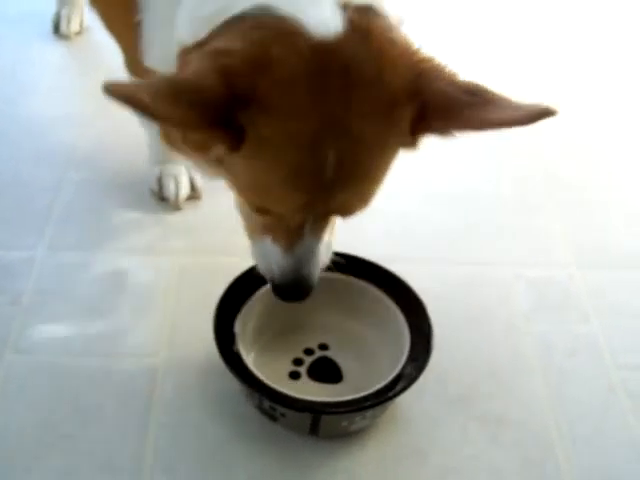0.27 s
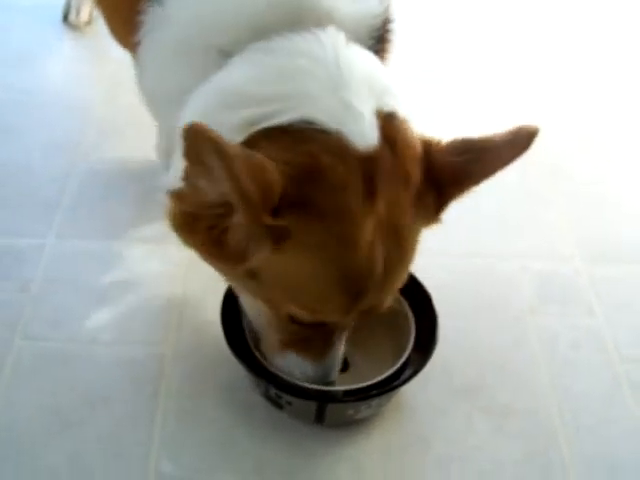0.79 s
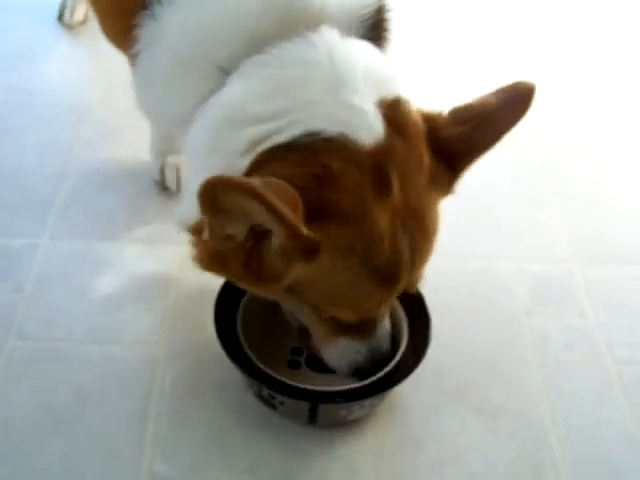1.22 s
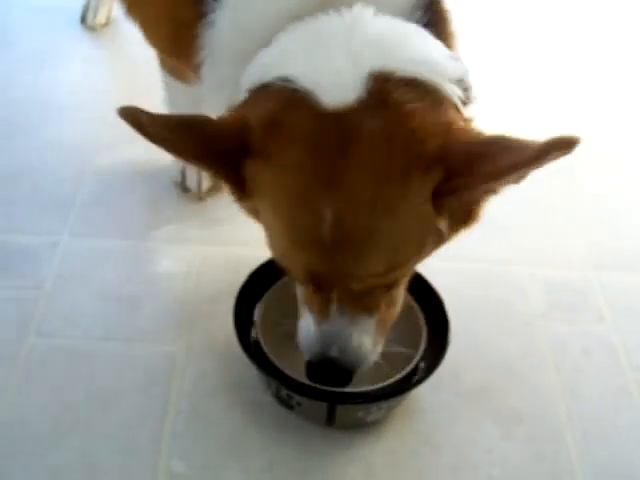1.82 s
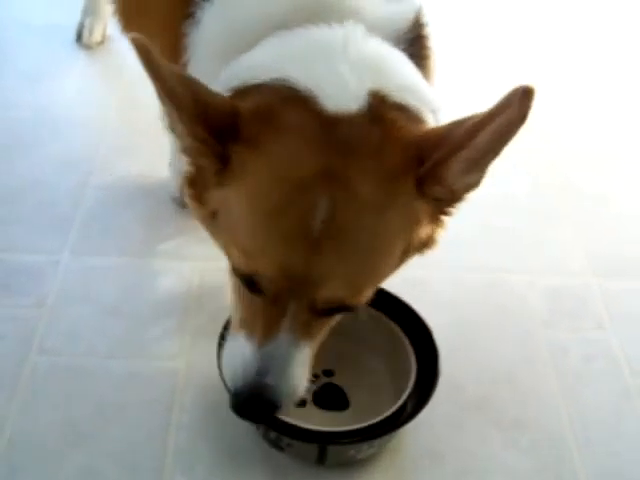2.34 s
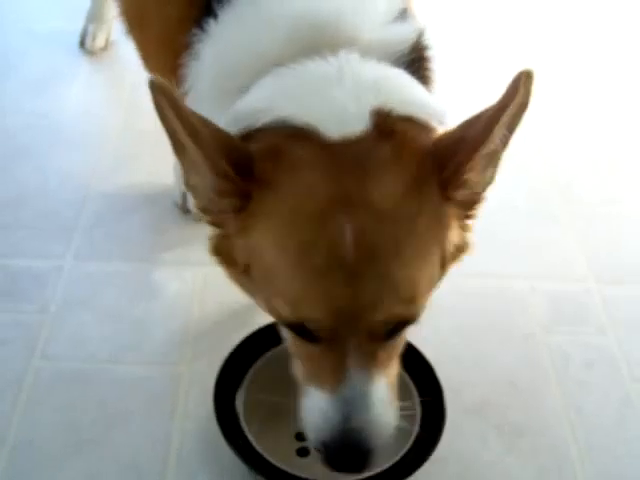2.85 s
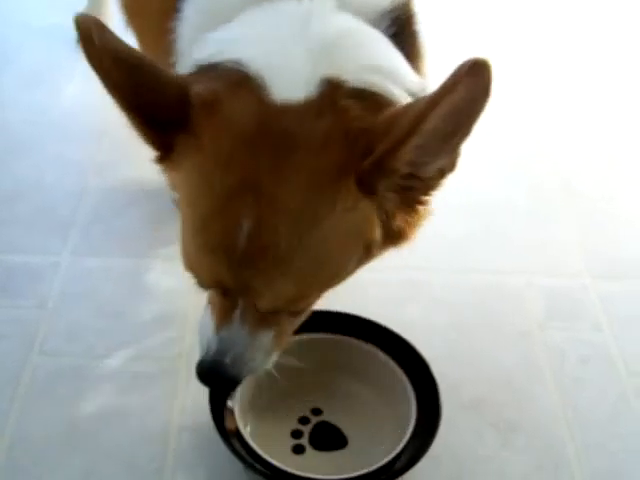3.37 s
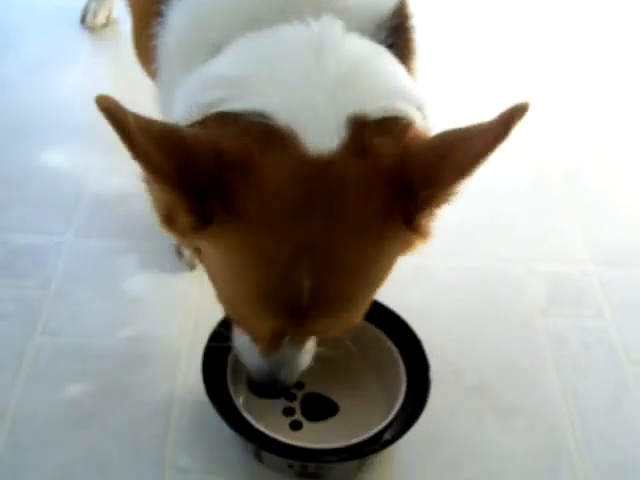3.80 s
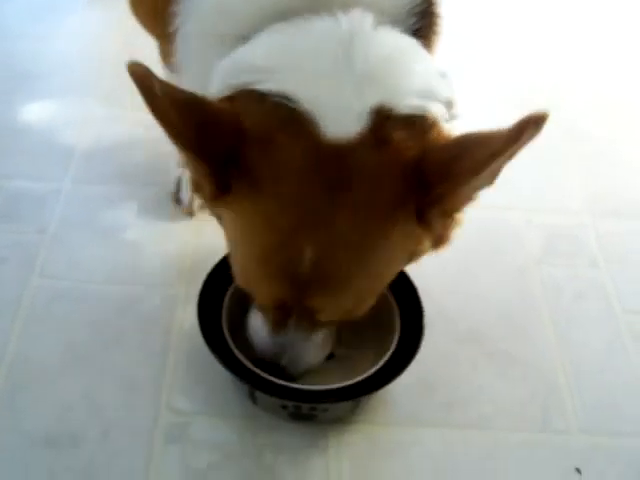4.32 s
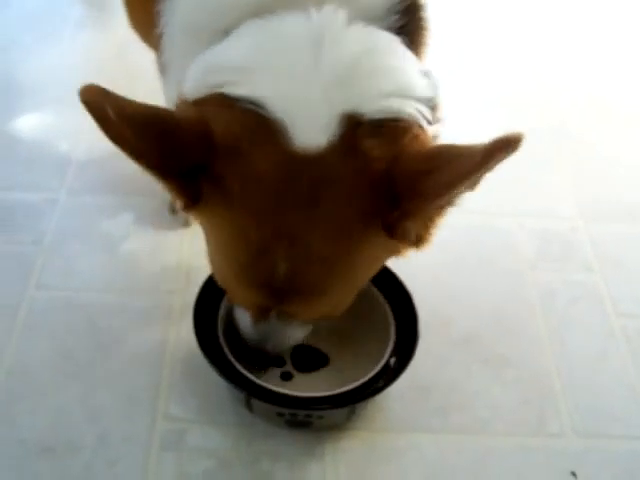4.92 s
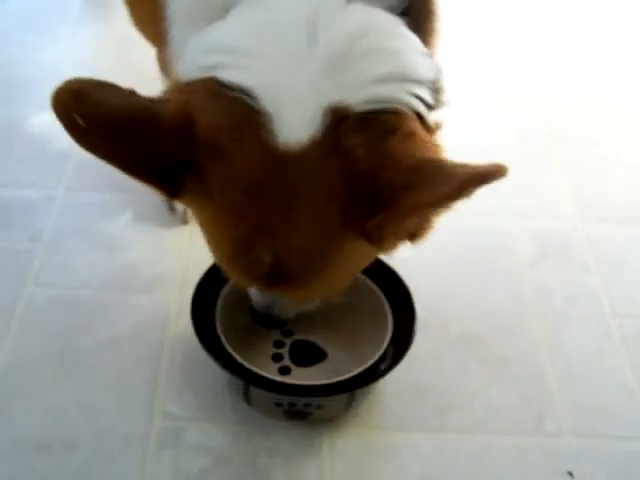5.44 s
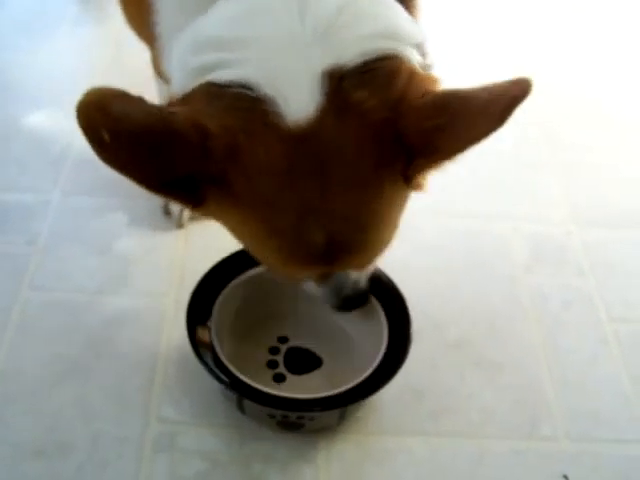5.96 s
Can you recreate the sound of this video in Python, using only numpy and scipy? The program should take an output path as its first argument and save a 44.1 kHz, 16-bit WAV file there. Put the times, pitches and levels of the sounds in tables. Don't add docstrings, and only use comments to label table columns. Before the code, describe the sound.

A low, slightly unsteady fridge hum and room murmur run throughout, with faint nose hiss and wet fizz. At 0.06 seconds a sniff leads into sharp wet smacks and dry clicks around 0.27 and 0.35, with another smack near 0.65. Until 1.9 there are only light laps and tiny ticks. Short low scrapes of the bowl on tile come at 1.9, 2.3 and 2.7, with a hard clack at 2.26 and a wet smack at 2.5. Around 3.5 a claw skids and crackles, the bowl knocks down at 3.56, and a loud smack snaps at 3.6. Quieter licking follows. At 4.73 a click sets the bowl ringing like a small bell for a quarter second, with smacks to 5.04. A very loud knock and smack at 5.51 bounces at 5.56 with roomy wash; short knocks and piercing clicks hit at 5.83 and 5.87, then faint laps. Small close microphone, limited treble, clipped peaks.

```python
import sys
import numpy as np
from scipy import signal
from scipy.fft import rfft, irfft, next_fast_len
from scipy.io import wavfile
from scipy.ndimage import uniform_filter1d, map_coordinates

SR = 44100
rng = np.random.default_rng(int(sys.argv[2]) if len(sys.argv) > 2 else 0)


def store_pcm(level_fs):
    pcm = np.round(np.clip(level_fs, -1, 1) * 32767).astype(np.int16)
    wavfile.write(sys.argv[1], SR, np.atleast_2d(pcm).T)


def boost_factor(decibels):
    exponent = np.asarray(decibels, float) / 20
    return 10 ** exponent


N = 272979
T = np.arange(N) / SR

# start in seconds, peak in dB, centre in Hz, width in octaves, room answer in dB.
SMACKS = [(0.267, -11, 4210, 2.6, -7), (0.35, -1.5, 3600, 1.4, -8.5), (0.6427, -15, 6340, 1.3, -13),
          (0.7103, -27, 2290, 0.62, -3.5), (1.9734, -25, 3750, 0.92, -7), (2.5024, -8, 6850, 2.1, -8),
          (3.5985, 1.5, 3860, 1.17, -10.5), (4.4682, -22.5, 4500, 1.5, -27.5), (4.483, -17, 3020, 0.79, -9),
          (4.7315, -14.5, 3920, 1.1, -5.5), (4.8299, -1.5, 3570, 1.1, -8.5), (5.0374, -8, 4400, 1.1, -16),
          (5.5139, 7, 3380, 1.2, -17), (5.8295, -8.5, 3760, 0.78, -3), (5.8705, -12, 3440, .7, -6)]
# start in seconds, peak in dB, centre in Hz, width in octaves.
LAPS = [(0.0074, -24, 7720, 0.9), (0.224, -30, 3630, 2.7), (0.9472, -24, 6230, 2.8),
        (0.99, -32.5, 3980, 1.5), (1.0988, -30.5, 3860, 3.6), (1.431, -35, 3380, 1.7),
        (1.825, -38, 5480, 2), (2.9417, -28, 2270, 2.1), (3.323, -32.5, 4930, 2.5), (4.281, -35, 4500, 2.1),
        (4.989, -28.5, 4820, 1.4), (5.1906, -32, 6400, 1.1), (5.256, -32, 5080, 2.6),
        (5.7935, -39.5, 2440, .93), (6.013, -30, 2720, 1.4), (6.169, -27, 3160, 1.5)]
SMACK_T60, LAP_ROOM_DB = 0.045, -3

# start and length in seconds, level in dB, centre in Hz, width in octaves.
SWELLS = [(.06, .2, -47, 3500, .45), (.3475, .022, -22, 4000, 1.5), (2.35, .07, -46, 1480, .12),
          (2.493, .022, -31, 5800, 1.1), (2.13, .12, -49, 2800, .9), (2.9, .18, -48, 3200, .8),
          (1.8, .1, -50, 2500, 1.5), (2.915, .06, -44, 2330, .22), (3.93, .07, -48, 5500, 1.2),
          (2.57, .29, -40, 3300, .65), (4.735, .09, -33, 4100, .9), (4.745, .085, -43, 2400, .8),
          (4.822, .03, -25, 4200, 1.5), (5.032, .011, -25, 5100, .8), (5.518, .06, -26, 3000, 1),
          (5.788, .025, -47, 5500, .5), (5.824, .005, -42, 1500, 1.5)]
SWELL_SOFTER = 1.5

# frequency in Hz, level in dB per Hz.
NOSE = [(1200, -12), (2300, -1.5), (2900, -9), (3500, -5.5), (4100, 1.5), (4900, -17.5), (8000, -52)]
# frequency in Hz, level in dB per Hz.
FIZZ = [(3500, -52), (5000, 2.5), (6800, 5), (8200, -6)]
# frequency in Hz, level in dB per Hz.
SKID = [(470, -35), (800, -16), (1240, -17.5), (2500, -7), (3370, -6.5), (3740, -5), (7040, -22),
        (7900, -23.5), (10300, -53), (17400, -120)]
# time in seconds, level in dB.
SLIP = [
    (3.46, -51.5),
    (3.54, -24),
    (3.61, -33.5),
]
NOSE_DB, NOSE_SWING_DB, NOSE_GRAIN_DB = -52, 1.8, 2.2
FIZZ_DB, FIZZ_SWING_DB, SKID_GRAIN_DB = -57.5, 0.5, 4.5
SPIT_DB, SPIT_SPREAD_DB = -38, 8.5

# start in seconds, peak in dB, pitch in Hz, room answer in dB.
TICKS = [(0.2635, -8.5, 4400, -22.5), (0.3518, -6, 3570, -13.5), (0.9502, -18, 6450, -15),
         (1.1016, -22.5, 3950, -22.5), (1.4337, -27, 1800, -12.5), (2.1279, -9.5, 2890, -32),
         (2.2632, 0.5, 2450, -33.5), (2.37, -31.5, 4180, -28), (2.5031, -13, 6900, -31),
         (2.5387, -7.5, 4480, -29), (0.7228, -21, 2420, -26), (3.2024, -16.5, 4110, -28.5),
         (3.5174, -9.5, 2750, -26), (3.5328, -13.5, 2590, -10), (3.5985, 5.5, 4540, -30),
         (3.7938, -12.5, 5100, -40.5), (4.134, -24.5, 2260, -17.5), (4.2783, -29, 4200, -16),
         (4.4691, -15, 3320, -48.5), (4.482, -9, 3410, -34), (4.514, -14, 2650, -28.5),
         (4.7314, 0, 2170, -33.5), (5.1528, -19, 2050, -26), (5.2863, -22, 2230, -24.5),
         (5.5126, 6, 3530, -49.5), (5.8296, 0, 3800, -30.5), (5.8716, 12, 3430, -34.5),
         (6.108, -15, 5200, -29)]
# start in seconds, peak in dB, pitch in Hz, room answer in dB.
CLACKS = [(0.268, -16.5, 1880, -21), (0.351, -34.5, 1450, -17.5), (1.062, -31, 1065, -12),
          (2.2614, -5, 1270, -26.5), (5.8253, -21.5, 1160, -24), (5.5095, -28.5, 1494, -26),
          (2.2615, -14, 593, -33.5), (3.563, -7, 732, -36), (3.599, -14.5, 1475, -11.5),
          (4.828, -23.5, 1250, -3.5), (5.5128, 3, 1610, -21), (5.5127, 0, 790, -40)]
# start in seconds, peak in dB, pitch in Hz, room answer in dB.
SNAPS = [(0.764, -28.5, 4100, -37.5), (2.2616, -4.5, 3930, -50), (2.263, -22, 8700, -45.5),
         (3.4, -32, 7300, -30.5), (5.8716, -3.5, 10000, -36), (5.0418, -4.5, 4960, -34.5),
         (4.7313, -1, 4400, -42), (5.0385, -8, 5500, -45), (11, -22, 4500, -11.5)]
# start in seconds, peak in dB, pitch in Hz.
PIPS = [(0.2205, -29, 3500), (0.5883, -22, 6000), (0.642, -29, 7020), (0.709, -32, 2310),
        (2.878, -23, 3480), (0.798, -30.5, 1850), (0.8915, -38.5, 4200), (0.987, -24, 3960),
        (1.034, -31, 1840), (1.3495, -26, 1830), (1.59, -30.5, 2100), (1.764, -29, 2680),
        (1.826, -22.5, 5350), (1.971, -26.5, 4100), (2.173, -27, 2580), (2.219, -25, 3220),
        (3.147, -26, 3800), (3.3206, -37.5, 3170), (3.338, -28, 2590), (3.3605, -26.5, 3350),
        (3.4774, -21.5, 3250), (3.8502, -23.5, 5380), (3.877, -26.5, 3630), (4.3627, -24, 3040),
        (4.392, -27, 2630), (4.404, -23.5, 4980), (6.012, -26.5, 1920), (6.089, -33.5, 3160),
        (6.127, -25, 4680), (6.1688, -30.5, 3110)]
# start in seconds, peak in dB, pitch in Hz.
CATCHES = [(3.5206, -16.5, 2680), (3.5285, -11.5, 3650), (3.5341, -17.5, 2540), (3.539, -13.5, 4000),
           (3.5424, -18.5, 2640), (3.548, -12, 3700), (3.5518, -20.5, 3040), (3.6007, -2.5, 4160),
           (3.6052, -6, 4350), (3.6084, -3.5, 4410), (3.6126, -8.5, 4090), (4.8265, -9, 2020),
           (4.8316, -11.5, 2050), (4.8384, -19, 2090), (4.8414, -14.5, 4760)]
# start in seconds, peak in dB, pitch in Hz.
FLECKS = [(.685, -32, 2450), (.748, -30, 2400), (.792, -32, 7000), (1.258, -33, 7000), (1.272, -31, 5200),
          (1.272, -34, 2900), (1.368, -35, 6200), (1.393, -34, 5300), (1.434, -30, 5000),
          (1.449, -30, 4800), (1.479, -35, 3900), (1.505, -33, 6800), (2.185, -31, 2610), (2.57, -32, 2400),
          (2.83, -31, 2100), (3.564, -17, 4240), (4.03, -34, 2800), (4.115, -33, 5900), (4.157, -33, 5800),
          (4.226, -36, 6500), (4.262, -34, 3300), (4.305, -32, 4300), (4.318, -34, 2830), (4.33, -36, 7000),
          (4.358, -33, 2870), (4.383, -30, 5200), (4.449, -32, 4800), (4.89, -26, 3900), (5.028, -27, 4300),
          (5.132, -31, 5800), (5.183, -35, 5200), (5.259, -30, 4800), (5.296, -32, 3200),
          (5.314, -30, 5200), (5.443, -34, 5400), (5.5162, -4, 3200), (5.863, -26, 6800),
          (5.933, -29, 4900), (5.983, -28, 6000), (5.983, -30, 2300), (.277, -22, 1900), (.361, -22, 1600),
          (.372, -18, 2300)]
TICK_CYCLES, PIP_CYCLES, CLACK_CYCLES, SNAP_CYCLES, FLECK_CYCLES = 7.6, 9.4, 9.7, 13, 8.5
PIP_ROOM_DB, CATCH_ROOM_DB, FLECK_ROOM_DB = -24.5, -27.5, -28
CATCH_DB, FLECK_DB = 4.5, 3
# delay in seconds, level in dB.
ECHOES = [
    (.0011, -5),
    (.0023, -8),
    (.0037, -12),
]

# start in seconds, peak in dB, upper body in dB,
# fall by 60 dB in seconds, room answer in dB.
KNOCKS = [
    (3.563, -7, -15, 0.28, -12.5),
    (5.513, -1.5, -3.5, 0.16, -6.5),
    (5.5556, -11.5, -1, 0.26, 1),
    (5.83, 1, -2.5, 0.059, -7.5),
]
# frequency in Hz, level in dB.
FLOOR = [(175, -6.5), (210, -9), (245, -12.5), (290, 1), (370, -0.5), (570, -1.5), (667, -5.5), (789, -4),
         (878, -11), (1100, -13), (1380, -13)]
SEATING = [0.97, 0.98, 0.75, 0.964]
THUMP_DB = [-20, -15, -14, -27]
THUMP_HZ, THUMP_T60 = 105, 0.35
UPPER_DIES = .9

# start in seconds, level in dB of each of three tones, free ring in seconds.
RINGS = [(4.7313, -9, -40, -60, .24), (4.761, -19, -60, -60, .21), (4.768, -18, -60, -60, .203),
         (4.768, -60, -60, -18, .125), (4.778, -20.5, -60, -60, .045), (5.513, -44, -30, -48, .1),
         (5.547, -18.5, -60, -60, .125), (5.83, -40, -33, -48, .012), (5.858, -29, -60, -60, .19)]
BOWL = [
    1855,
    4246,
    4764,
]
# phase in radians, level in steps of 3 dB.
UNREST = [.2, .85, .6]
RING_T60 = [.53, .5, .7]
RING_BUILD_S = [.016, .002, .004]
FLASH_DB = [-5, 1.5, -8]
FLASH_T60 = .125
DAMP_DB, DAMP_S = -8, .05
# start in seconds, level in dB, frequency in Hz, length in
# seconds.
GLINTS = [(.555, -50, 4246, .075), (1.645, -50, 4246, .05), (.64, -37, 6700, .04), (2.262, -40, 2580, .055),
          (2.262, -40, 1950, .05), (4.675, -48, 4246, .055), (4.735, -43, 7660, .08),
          (4.985, -46, 7450, .045), (5.045, -37, 3950, .05), (5.835, -41, 7300, .03),
          (6.11, -54, 4764, .06), (6.155, -48, 6650, .03),
          (4.731, -11, 4764, .041), (4.732, -27, 4651, .07), (4.732, -31, 4264, .1),
           (4.732, -37, 4474, .07), (4.732, -41, 4161, .07), (4.732, -42, 3849, .09),
           (5.515, -11, 4246, .03), (5.545, -23, 4300, .03), (5.578, -26, 4246, .09),
           (5.832, -19, 4246, .022), (2.262, -45, 1480, .04)]

# start and length in seconds, rumble in dB, grit in dB.
DRAG = [
    (1.935, 0.15, -32, -34),
    (2.312, 0.15, -32, -35),
    (2.667, 0.17, -33.5, -38.5),
]
# frequency in Hz, level in dB per Hz.
RUMBLE = [(47, -53), (80, -12.5), (140, -13.5), (167, 4.5), (253, 0.5), (345, -10), (579, -25.5),
          (700, -29), (910, -43.5), (1540, -120)]
# frequency in Hz, level in dB per Hz.
GRIT = [(290, -53), (500, -4), (581, -6.5), (1290, -18), (1480, -15), (2220, -15.5), (4330, -20.5),
        (7900, -32), (10300, -46.5), (17400, -120)]
PUSH_RISE_S, PUSH_EASE_S, PUSH_RANGE_DB = .035, .04, 12
# start in seconds, level in dB, frequency in Hz, length in seconds.
STIRS = [(1.955, -34, 240, .05), (1.965, -41, 517, .08), (1.99, -32, 178, .06), (2.035, -29, 178, .06),
         (2.335, -33, 180, .07), (2.39, -33, 175, .07), (2.365, -30.5, 250, .08), (2.375, -41, 571, .06),
         (2.72, -30, 245, .08), (2.7, -40, 380, .09), (3.572, -22, 280, .03), (5.512, -14, 185, .022),
         (5.523, -14, 300, .04), (5.545, -19, 590, .045), (5.553, -12, 199, .03), (5.575, -15, 291, .045),
         (5.6, -31, 115, .12), (5.635, -28, 220, .04), (5.865, -23, 295, .04), (5.905, -30, 310, .03),
         (5.92, -33, 120, .05)]
# start in seconds, level in dB, frequency in Hz, length in seconds.
SINGS = [(1.97, -38, 4246, .105), (2.335, -49, 4246, .13), (2.372, -43, 4246, .045), (2.74, -47, 4246, .03),
         (4.822, -32, 3200, .02), (4.828, -32, 4030, .022), (4.826, -33, 4420, .02),
         (4.845, -38, 3230, .045), (5.465, -49, 4500, .03)]

# start in seconds, level in dB, centre in Hz, width in octaves.
WASHES = [
    (3.601, -28, 3490, 1.7),
    (4.83, -33, 3610, 1.1),
    (5.531, -10, 3000, 1.5),
    (5.87, -38, 3640, 0.79),
]
WASH_BUILD_S, WASH_T60 = 0.013, 0.33

# multiple of the mains frequency, level in dB.
HUM = [
    (1, -69.5),
    (2, -38.5),
    (4, -39),
    (6, -48.5),
]
MAINS_HZ = 60
# frequency in Hz, level in dB.
RATTLE = [(157, -56.5), (196, -50), (264, -49.5), (314, -47.5), (337, -49.5), (384, -50.5), (408, -47.5),
          (456, -52), (471, -51.5), (669, -62.5)]
# frequency in Hz, level in dB per Hz.
AIR = [(12, -27), (20, -1), (70, -5), (112, -6), (137, 0), (181, -11.5), (244, -3), (284, -7), (383, -6),
       (543, -11.5), (1040, -16), (1900, -26.5), (4120, -24), (6800, -36), (7900, -49.5), (10300, -74.5),
       (17400, -120)]
AIR_DB = -40

# frequency in Hz, level in dB.
MIC = [(10, -19.5), (60, -1), (150, 0), (6000, -1), (7600, -3.5), (8050, -15), (8400, -58)]


def unit(x):
    return x / np.sqrt(np.mean(x ** 2) + 1e-20)


def along(points, hz):
    f, v = np.transpose(points)
    return np.interp(np.log(hz + 1), np.log(f + 1), v, left=-120, right=-120)


def curve(points):
    s, db = np.transpose(points)
    return np.interp(T, s, db, left=-120, right=-120)


def wobble(rate):
    knots = rng.standard_normal(int(N * rate / SR) + 4)
    return map_coordinates(knots, [T * rate])


def filtered(x, response):
    m = next_fast_len(len(x) + 4096)
    return irfft(rfft(x, m) * response(np.fft.rfftfreq(m, 1 / SR)), m)[:len(x)]


def hiss(spectrum, grain_db, rate):
    noise = filtered(rng.standard_normal(N), lambda hz: boost_factor(along(spectrum, hz)))
    return unit(boost_factor(grain_db * wobble(rate)) * noise)


def puff_of_air(hz, octaves):
    noise = rng.standard_normal(SR // 2)
    return unit(filtered(noise, lambda f: 1 / (1 + (2 * np.log2((f + 1) / hz) / octaves) ** 4)))


def add(x, s, sound):
    part = x[round(s * SR):][:len(sound)]
    part += sound[:len(part)]


def wavering(hz, turns):
    flicker = boost_factor(3 * turns * wobble(60))
    return unit(flicker * np.sin(2 * np.pi * hz * T + turns * wobble(62)))


def glints(rows, turns):
    out = np.zeros(N)
    for s, db, hz, length in rows:
        u = np.clip((T - s) / length, 0, 1)
        out += boost_factor(db - 5.8 * u) * np.sin(np.pi * u ** .5) * wavering(hz, turns)
    return out


def smacks():
    out, t = np.zeros(N), T[:SR // 2]
    laps = [(*lap, LAP_ROOM_DB) for lap in LAPS]
    for s, db, hz, octaves, room_db in [*SMACKS, *laps]:
        shape_db = 2.5 * rng.standard_normal(60)

        def mouth(f):
            band = 1 + (np.log2((f + 1) / hz) / max(octaves / 2, .1)) ** 2
            return boost_factor(np.interp(f / 200, np.arange(60), shape_db)) / band

        depth_db = 4.2 * np.exp(-t / .03)
        flicker = unit(uniform_filter1d(rng.standard_normal(len(t)), size=40))
        crackle = rng.standard_normal(len(t)) * boost_factor(depth_db * flicker)
        burst = boost_factor(-60 * t / SMACK_T60) * (1 - np.exp(-t / 0.001))
        room = boost_factor(room_db - 60 * t / 0.35) * (1 - np.exp(-t / 0.011))
        add(out, s, boost_factor(db - 10) * unit(filtered(crackle, mouth)) * (burst + room))
    return out


def swells():
    out = np.zeros(N)
    for s, length, db, hz, octaves in SWELLS:
        u = np.linspace(0, 1, round(length * SR))
        shape = np.sin(np.pi * u ** 0.79) ** (0.23 + SWELL_SOFTER * length)
        add(out, s, boost_factor(db) * puff_of_air(hz, octaves)[:len(u)] * shape)
    return out


def breath():
    return boost_factor(NOSE_DB + NOSE_SWING_DB * wobble(12)) * hiss(NOSE, NOSE_GRAIN_DB, rate=24)


def saliva():
    out, t = np.zeros(N), T[:200]
    when, size, pitch = rng.random((130, 3)).T
    level_db = np.minimum(SPIT_DB - SPIT_SPREAD_DB * np.log(size), -26)
    for s, db, hz in zip(when * T[-1], level_db, 2500 * 3 ** pitch):
        add(out, s, boost_factor(db - 60 * t * hz / 3.9) * np.sin(2 * np.pi * hz * t))
    return out + boost_factor(FIZZ_DB + FIZZ_SWING_DB * wobble(9.5)) * hiss(FIZZ, grain_db=4.5, rate=72)


def paw_skid():
    return boost_factor(curve(SLIP)) * hiss(SKID, SKID_GRAIN_DB, rate=520)


def ticks(rows, cycles):
    out, t = np.zeros(N), T[:SR // 4]
    for s, db, hz, room_db in rows:
        ring = np.sin(2 * np.pi * hz * t) * boost_factor(-60 * t * hz / cycles) * (1 - np.exp(-t * hz / 0.77))
        noise = rng.standard_normal(len(t))
        wash = unit(filtered(noise, lambda f: 1 / np.hypot(f - hz, 0.21 * hz) ** 2))
        room = boost_factor(room_db - 9 - 60 * t / 0.28) * (1 - np.exp(-t / 0.0013))
        add(out, s, boost_factor(db + 3.5) * (ring + wash * room))
    return out


def claws():
    pips = [(*pip, PIP_ROOM_DB) for pip in PIPS]
    catches = [(s, db + CATCH_DB, hz, CATCH_ROOM_DB) for s, db, hz in CATCHES]
    light = ticks([*TICKS, *catches], TICK_CYCLES) + ticks(pips, PIP_CYCLES)
    return light + ticks(CLACKS, CLACK_CYCLES) + ticks(SNAPS, SNAP_CYCLES)


def flecks():
    return ticks([(s, db + FLECK_DB, hz, FLECK_ROOM_DB) for s, db, hz in FLECKS], FLECK_CYCLES)


def nearby(x):
    out = x.copy()
    for k, (s, db) in enumerate(ECHOES):
        out += (-1) ** k * boost_factor(db) * np.roll(x, round(s * SR))
    return out


def knocks():
    out, t = np.zeros(N), T[:SR // 2]
    hz, level = np.transpose(FLOOR)[:, :, None]
    upper = hz > 450
    sides = np.where(upper, -1, (-1.) ** np.arange(len(hz))[:, None])
    for (s, db, upper_db, t60, room_db), seat, thump_db in zip(KNOCKS, SEATING, THUMP_DB):
        gain = boost_factor(db - 3 + level + upper * (upper_db + 4.5))
        detune = seat + .015 * rng.standard_normal(hz.shape)
        fade = boost_factor(-60 * t / (t60 * (300 / hz) ** UPPER_DIES))
        direct = sides * np.sin(2 * np.pi * hz * detune * t) * fade
        stirred = []
        for centre in hz:
            noise = rng.standard_normal(len(t))
            stirred.append(unit(filtered(noise, lambda f: 1 / (1 + ((f - centre) / (0.17 * centre)) ** 2))))
        room_fade = boost_factor(room_db - upper - 60 * t / (0.35 * (300 / hz) ** 0.055))
        boom = np.array(stirred) * room_fade * (1 - np.exp(-t / 0.002))
        thump = boost_factor(db + thump_db - 60 * t / THUMP_T60) * (1 - np.exp(-t / 0.0029))
        thump = thump * np.sin(2 * np.pi * THUMP_HZ * t)
        add(out, s, (gain * (direct + boom)).sum(axis=0) + thump)
    return out


def rings():
    modes = np.array([wavering(hz, turns) for hz, turns in zip(BOWL, UNREST)])
    t60, build, flash_db = np.array([RING_T60, RING_BUILD_S, FLASH_DB])[:, :, None]
    t, level = T[:SR // 2], np.zeros((3, N + SR))
    flash = boost_factor(flash_db - 60 * t / FLASH_T60) * (1 - np.exp(-t / 0.00093))
    shape = boost_factor(-60 * t / t60) * (1 - np.exp(-t / build)) + flash
    for s, *db, free in RINGS:
        damped = 1 - (1 + boost_factor(DAMP_DB)) * np.clip((t - free) / DAMP_S, 0, 1)
        level[:, round(s * SR):][:, :len(t)] += boost_factor(db)[:, None] * shape * damped
    return (level[:, :N] * modes).sum(axis=0) + glints(GLINTS, turns=.4)


def drag():
    rumble, grit = hiss(RUMBLE, grain_db=0.5, rate=40), hiss(GRIT, grain_db=2.5, rate=200)
    out = np.zeros(N)
    for s, length, rumble_db, grit_db in DRAG:
        end = s + length
        push_db = curve([(s, -PUSH_RANGE_DB), (s + PUSH_RISE_S, 0), (end - PUSH_EASE_S, 0), (end, -PUSH_RANGE_DB)])
        out += boost_factor(push_db) * (boost_factor(rumble_db) * rumble + boost_factor(grit_db) * grit)
    return out + glints(STIRS, turns=.15) + glints(SINGS, turns=.3)


def washes():
    out, t = np.zeros(N), T[:SR // 2]
    for s, db, hz, octaves in WASHES:
        fade = boost_factor(db - 60 * t / WASH_T60) * (1 - np.exp(-t / WASH_BUILD_S))
        add(out, s, fade * puff_of_air(hz, octaves))
    return out


def fridge():
    out = boost_factor(AIR_DB) * hiss(AIR, grain_db=-0.7, rate=8.3)
    for k, db in HUM:
        out += boost_factor(db + 1.5 + 0.3 * k * wobble(9)) * np.sin(2 * np.pi * k * MAINS_HZ * T + k * k)
    for hz, db in RATTLE:
        out += boost_factor(db + 3.2 * wobble(6.6)) * np.sin(2 * np.pi * hz * T + 1.58 * wobble(3.7))
    return out


def scene():
    dog = smacks() + swells() + breath() + saliva() + paw_skid() + nearby(claws()) + nearby(flecks())
    bowl = knocks() + rings() + drag()
    return (dog + bowl + washes() + fridge())[None]


def low_pass(x):
    return signal.sosfilt(signal.butter(12, 8050, fs=SR, output="sos"), x)


def record(dry):
    x = filtered(dry[0], lambda hz: boost_factor(along(MIC, hz)))
    over = np.maximum(np.abs(x) - .28, 0)
    keep = np.exp(-1 / (.05 * SR))
    duck = signal.lfilter([1 - keep], [1, -keep], over)
    x = x / (1 + 11 * duck)
    x = x / (1 + np.abs(x) ** 30) ** (1 / 30)
    return low_pass(x[None])


dry = scene()
out = record(dry)
store_pcm(out)
```